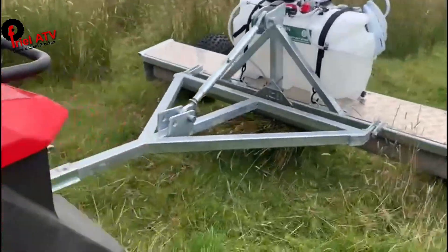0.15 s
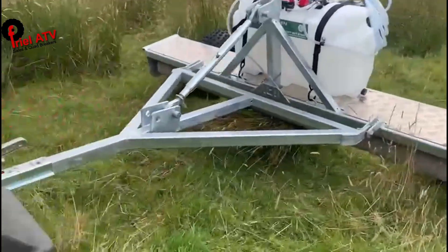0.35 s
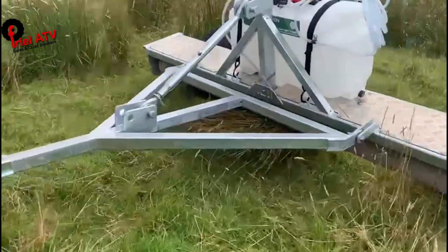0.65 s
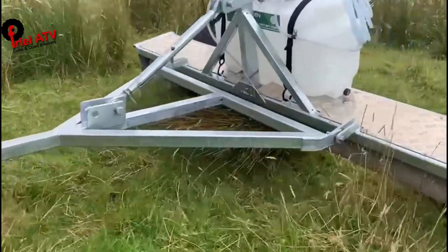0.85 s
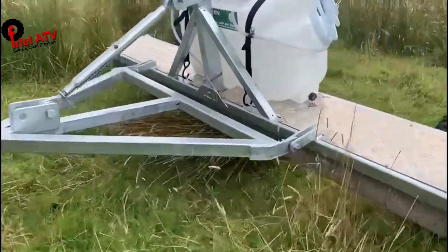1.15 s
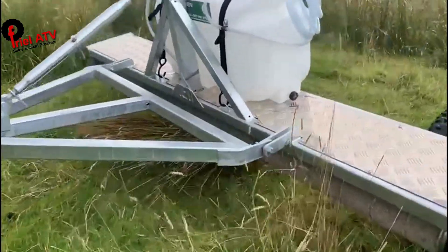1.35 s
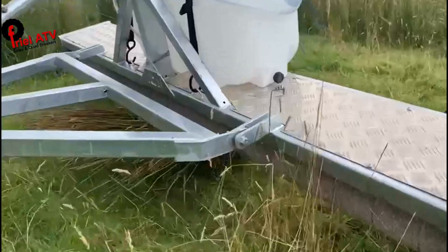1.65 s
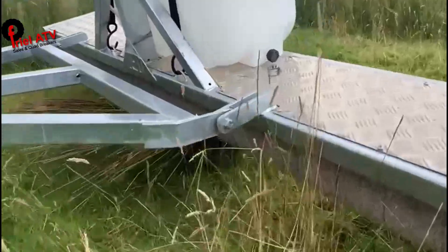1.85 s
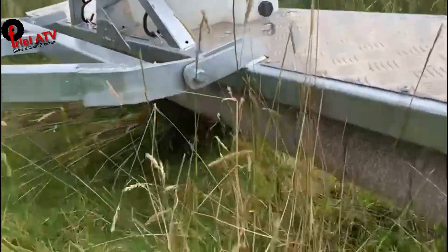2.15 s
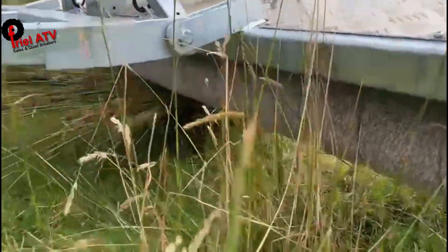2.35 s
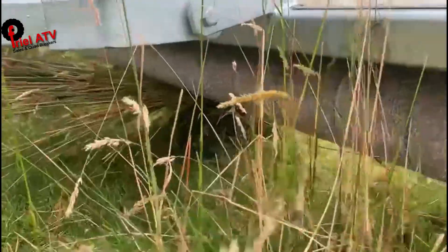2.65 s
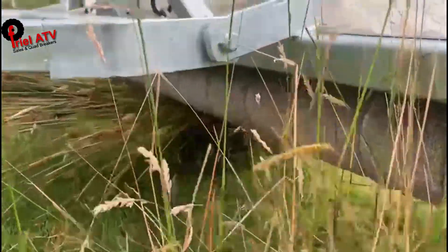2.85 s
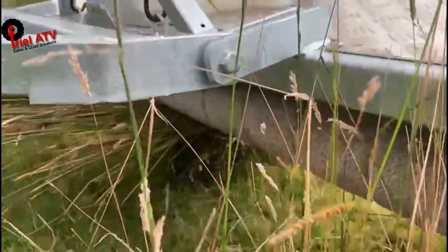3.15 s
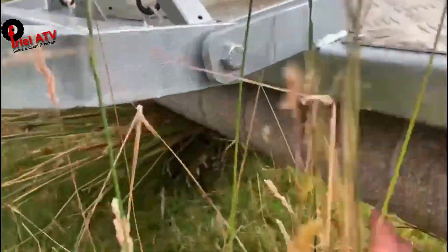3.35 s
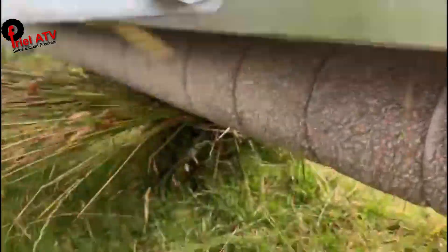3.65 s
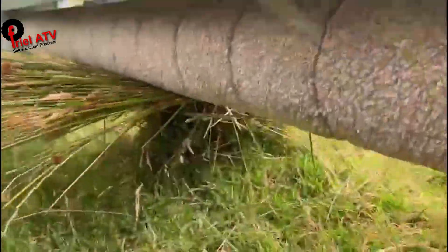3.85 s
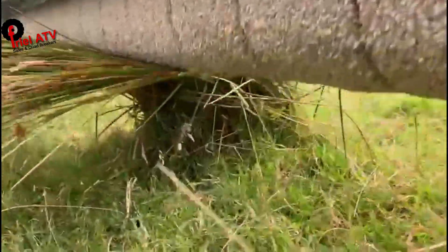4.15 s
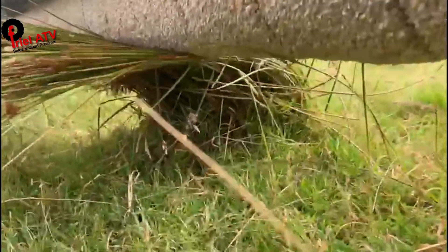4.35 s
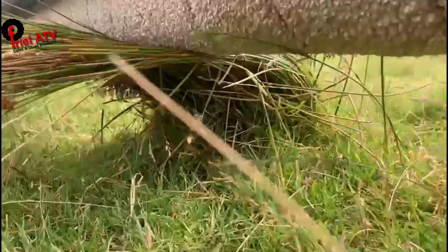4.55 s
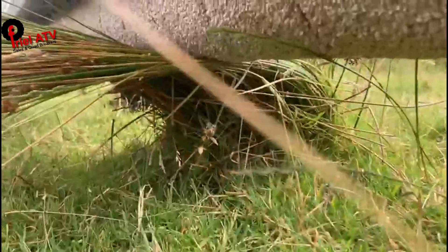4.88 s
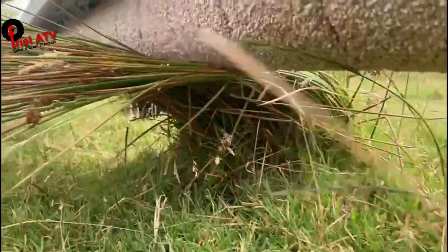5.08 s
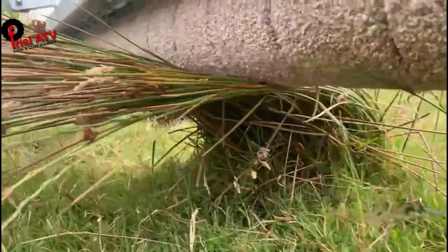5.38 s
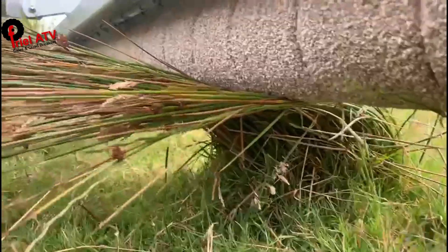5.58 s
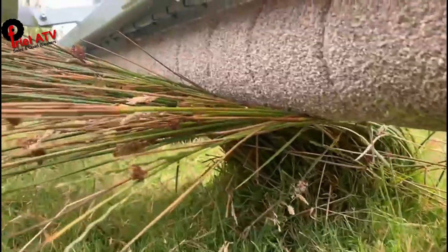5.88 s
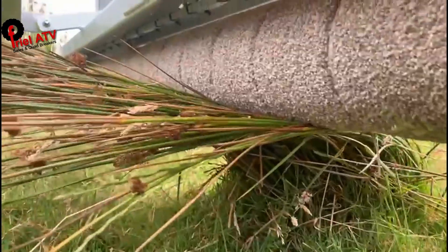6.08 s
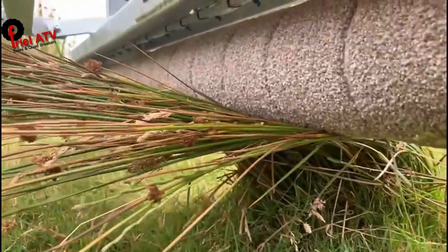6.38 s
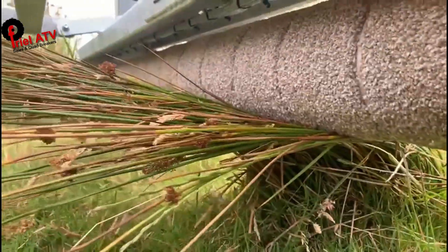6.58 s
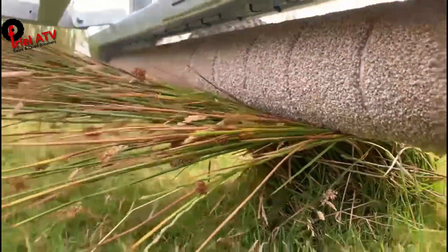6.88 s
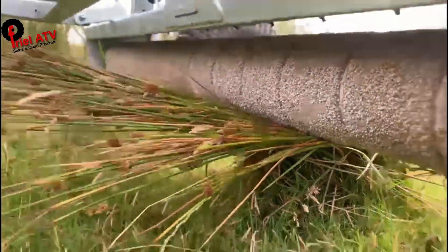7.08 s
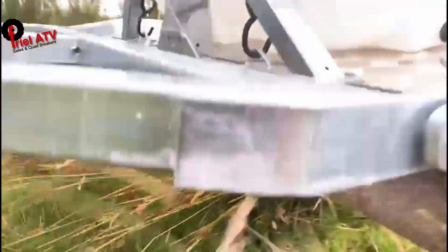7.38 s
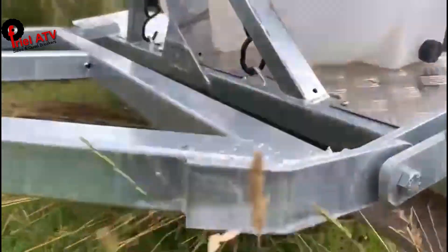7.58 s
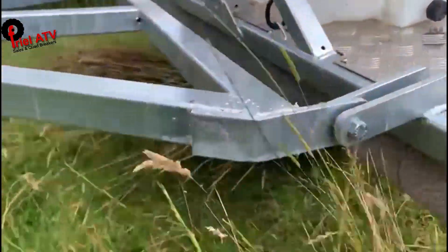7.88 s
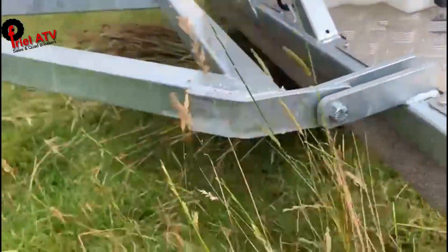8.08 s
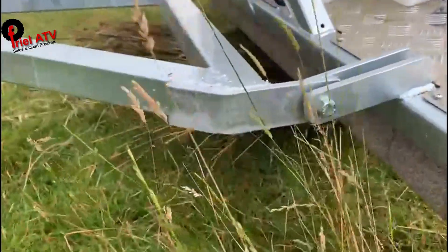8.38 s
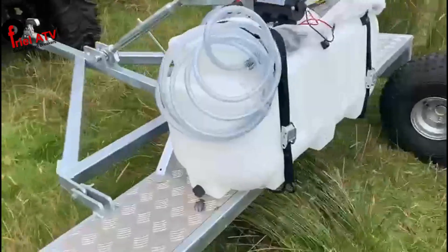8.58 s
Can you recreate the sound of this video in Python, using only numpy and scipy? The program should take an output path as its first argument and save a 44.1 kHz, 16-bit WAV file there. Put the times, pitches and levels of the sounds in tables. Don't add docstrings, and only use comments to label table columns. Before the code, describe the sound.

Outdoors, a small engine idles continuously at roughly a dozen firings a second, boomy and slightly uneven. Hissing gas bursts, hollow pipe rings and light ticking ride on each beat. The listener walks around it, from further off to close by. There are dry stalk clicks early in the walk and a louder cluster midway, then late knocks and brushing, a heavy handling thump, and a sudden jump to a softer viewpoint.

```python
import sys
import numpy as np
from scipy import signal
from scipy.fft import rfft, irfft, next_fast_len
from scipy.io import wavfile
from scipy.ndimage import uniform_filter1d

SR = 44100
rng = np.random.default_rng(int(sys.argv[2]) if len(sys.argv) > 2 else 0)


def master(y):
    cut = np.clip(np.atleast_2d(y).T, -1, 1)
    pcm = np.round(cut * 32767)
    wavfile.write(sys.argv[1], SR, pcm.astype(np.int16))


def decibels_to_gain(level_db):
    exponent = np.asarray(level_db, float) / 20
    return 10 ** exponent


N = 384993

# f/Hz, level/dB, t60/s, lag after firing/ms
CHAMBERS = [
    (54.9, -23.8, 0.156, -5.04),
    (75.2, -14.2, 0.053, 5.26),
    (107.6, -15.2, 0.092, 9.72),
    (158.9, -16.9, 0.036, 2.71),
    (193.5, -22.8, 0.036, 14.11),
    (324.4, -35.7, 0.07, 4.7),
    (327.8, -33.2, 0.047, 9.55),
]
# f/Hz, density/dB per Hz
PUFF_SPECTRUM = [(30, 7), (100, 12), (200, 3.5), (345, -7.5), (430, -3.5), (520, -7.5), (690, -6),
                 (780, -11.5), (950, -15.5), (1050, -20), (1250, -17), (1550, -20.5), (2050, -30),
                 (2300, -40)]
# f/Hz, depth/dB
PULSE_DEPTH = [(100, 9.6), (400, 5.5), (900, 11), (1300, 9), (1800, 7), (3500, 10), (8000, 5.4)]
# lag after firing/ms, share/1, length/ms
PIPE_ECHOES = [
    (3.22, 0.9, 2.7),
    (12.5, 0.8, 7.5),
    (23.7, 0.71, 5.4),
    (35.3, 0.85, 3.5),
]
# t/s, share/1
PUFF_BITE = [(0, 0.59), (2, .85), (3, 1), (5, 0.86), (6.5, 1.13), (7.6, 1.31), (8.73, 1.05)]
# f/Hz, density/dB per Hz
CLATTER_SPECTRUM = [(2100, -4.5), (2340, -5), (2520, -11.5), (2800, 2), (3100, -2.5), (3500, 1.5),
                    (4000, -22), (4700, -5), (5600, -14.5), (6500, -13), (7700, -8.5), (8100, -11.5),
                    (9200, -7.5), (10400, -17.5), (11000, -23)]
# t/s, level/dB, f/Hz, t60/s
SHORT_RINGS = [(2.596, -28, 1240, 0.0028), (2.5964, -16, 2010, 0.0031), (2.5985, -19.5, 713, 0.0061),
               (2.6035, -41.5, 2005, 0.0048), (2.6545, -49, 5550, 0.0036), (3.885, -42.5, 2210, 0.01),
               (3.892, -32.5, 906, 0.02), (3.9012, -43.5, 4250, 0.004), (3.9016, -19.5, 1600, 0.0068),
               (3.904, -15.5, 729, 0.019), (3.907, -22, 408, 0.037), (3.9115, -42, 4200, 0.013),
               (3.912, -19, 1462, 0.0091), (3.9125, -28, 2290, 0.0012), (3.915, -13.5, 647, 0.018),
               (3.9185, -26, 413, 0.033), (3.9195, -28.5, 1380, 0.016), (3.92, -35, 3080, 0.0071),
               (3.9255, -38, 3150, .005), (3.872, -50, 4300, .008), (3.885, -48, 4300, .008),
               (3.9245, -34, 4340, 0.0035), (3.926, -28.5, 1100, 0.0095), (3.927, -35.5, 1940, 0.013),
               (3.933, -32.5, 556, 0.041), (3.938, -32.5, 790, 0.024), (7.09, -35.5, 840, .03),
               (7.168, -36, 840, .03), (7.552, -39, 910, .02), (7.776, -40, 884, 0.023),
               (7.8855, -38, 1710, 0.0067), (7.8865, -45, 5320, 0.0069), (7.885, -30.5, 3076, 0.0071),
               (7.886, -26.5, 960, 0.0094), (7.889, -11, 159, 0.032), (8.172, -47.5, 1200, 0.12),
               (8.4048, -7.5, 341, 0.028), (8.481, -8, 191, 0.016), (8.485, -29, 810, .012)]
# f/Hz, phase/rad
PHASE_TURN = [(138, 3.1416), (155, 3.8), (185, 4.6), (260, 5.8), (345, 6.3), (480, 6.6), (650, 9.1),
              (775, 10.2), (900, 12.5), (950, 12.7), (1120, 15.7), (1250, 16.7), (1400, 14.6), (1550, 15.2),
              (1770, 12.6), (2450, 12.4), (2600, 10.4), (2870, 10.6), (3000, 9.5), (3350, 9.4), (3700, 6.3),
             (4450, 6.2), (4800, 3.1), (5500, 3.1), (6000, 6.3), (6900, 6.3), (7200, 9.4), (7750, 9.4),
             (9000, 15.7), (12000, 15.7)]
# t/s, f/Hz
IN_STEP_EDGE = [(0, 146), (.85, 144), (1.08, 116), (1.45, 98), (1.6, 72), (2.0, 50), (2.15, 5), (8.73, 5)]
# f/Hz, share/1
RIGHT_LOOSE = [(150, .02), (300, .3), (500, .5), (700, .5), (1000, .3), (1150, .2), (1350, .45), (1900, .12),
               (2500, .8), (3100, .3), (4000, .7), (5100, .75), (6300, .8), (7400, .45), (8600, .7)]
# f/Hz, level/dB
FAR_DULLING = [(400, 5.5), (650, -1), (850, -9.5), (1500, -20), (1750, -3), (2000, -9), (2300, -19)]
# start/s, full/s, fading/s, end/s, level/dB
SWISHES = [
    (3.816, 3.825, 3.855, 3.865, -64),
    (3.86, 3.91, 3.93, 3.952, -65),
    (7.86, 7.89, 7.945, 7.975, -57.5),
    (7.985, 8.05, 8.115, 8.14, -59),
    (8.11, 8.14, 8.17, 8.22, -70),
    (8.375, 8.40, 8.41, 8.44, -76),
]
# f/Hz, level/dB
SWISH_COLOUR = [(2500, 5), (3100, 6), (3600, 3.5), (4000, 2), (4600, 5), (5500, 3), (6200, -1), (6600, -6)]
# start/s, full/s, fading/s, end/s, low f/Hz, high f/Hz, level/dB
SCRAPES = [
    (1.12, 1.17, 1.23, 1.28, 3000, 5500, -67),
    (1.17, 1.219, 1.31, 1.36, 2710, 4500, -67),
    (2.592, 2.592, 2.6, 2.612, 1200, 3200, -55.5),
    (3.875, 3.898, 3.925, 3.95, 700, 2490, -48),
    (8.374, 8.386, 8.43, 8.475, 700, 1990, -57),
    (8.38, 8.401, 7.4, 8.7, 2000, 4000, -66),
]
# f/Hz, level/dB
LOW_LIFT = [(22, -1), (32, -7), (48, 10), (62, 5.5)]
# f/Hz, level/dB
TAIL_PIPE = [(600, 0), (690, -3), (760, 0), (850, -5), (920, -3), (1020, 3.5), (1140, 4), (1260, -1),
             (1400, 0), (1520, -3.5), (1650, 0.5), (1900, 3.5), (2100, -1), (2250, -4)]
# start/s, end/s, low f/Hz, high f/Hz
TREBLE_IN_STEP = (7.84, 8.2, 2500, 7000)
# t/s, speed/rpm
SPEED = [(0.0, 1591.1), (0.4, 1491.4), (1.2, 1469.9), (1.6, 1544.1), (2.25, 1549.7), (3.15, 1549.3),
         (3.4, 1512.6), (3.8, 1553.5), (4.8, 1530.3), (5.15, 1511.8), (5.75, 1562.0), (6.0, 1529.5),
         (6.8, 1523.5), (7.1, 1562.5), (7.8, 1552.2), (8.4, 1507.5)]
# t/s, nearness to silencer/dB, facing the tail pipe/dB
WALK = [(0, -16, 7), (.4, -12.5, 4.5), (1.2, -11, 2), (2, -8, 1.5), (2.4, -6.5, -0.5), (2.8, -5.5, 0),
        (3.6, -4.5, 3.5), (4.4, -3, 0.5), (6.8, -3.5, 0.5), (7.2, -4, 0), (8, -6, 2), (8.73, -6, 1)]
# centre/s, half length/s, low rustle/dB, high rustle/dB
STIRS = [(.08, 0.41, -72.5, -82), (0.718, 0.13, -76.5, -81), (1.344, 0.31, -78, -93),
         (1.837, 0.17, -79.5, -76.5), (2.703, 0.28, -91.5, -87.5), (3.247, 0.4, -90.5, -85.5),
         (3.752, 0.1, -85, -83), (3.942, 0.062, -71, -85.5), (4.2, 0.17, -92.5, -84), (4.517, .1, -78, -96),
         (5.799, 0.4, -79, -100), (6.6, 0.71, -79, -101), (7.279, 0.098, -75, -80.5),
         (7.518, 0.18, -92, -85), (8.002, 0.11, -74, -85), (8.444, 0.22, -90.5, -102.5)]
# t/s, level/dB, f/Hz, t60/s
BUMPS = [
    (8.4035, -27, 1100, 0.0084),
    (8.4033, -37.5, 1900, 0.0052),
    (7.4, -24, 760, 0.0055),
    (8.4066, -15, 350, 0.018),
    (8.431, -10, 32, 0.076),
    (8.4086, -5, 49, 0.07),
]
# start/s, length/s
LOCKS = [(2.304, 0.13), (2.547, 0.0084), (2.619, 0.12), (2.838, 0.07), (3.053, 0.33), (3.478, 0.12),
         (3.66, 0.02), (3.755, 0.096), (3.98, 0.025), (4.052, 0.031), (4.155, 0.18), (4.535, 0.04),
         (4.88, 0.053), (4.99, 0.075), (5.243, 0.012), (5.437, 0.098), (5.911, 0.15), (6.313, 0.022),
         (6.454, 0.018), (7.166, 0.029), (7.363, 0.063), (7.453, 0.097), (7.69, 0.06), (8.05, 0.062)]
# t/s, f/Hz, phase/rad
LEAKS = [(3.21, 110, 0.16), (3.79, 95, .12), (4.07, 95, 0.21), (4.27, 115, .15), (4.52, 110, 0.16),
         (5.93, 105, .12), (5.98, 100, 0.22), (6.35, 105, 0.21), (7.48, 90, 0.27), (2.4, 110, 0.071)]
# t/s, low f/Hz, high f/Hz, phase/rad, lag/ms
CLOSE_TOUCHES = [(1.17, 3500, 5400, 1.3, 0), (1.23, 2900, 5600, 1.5, 0), (1.29, 2600, 4800, 1.3, 0),
                 (3.835, 2700, 4700, .4, 0), (2.6, 1100, 3250, 6.4, .5), (2.6, 3250, 7000, 0, 0),
                 (3.91, 1100, 2400, 4.5, .5), (3.91, 2400, 5600, 2.1, 0), (8.41, 1100, 2300, 2.1, 0),
                 (8.41, 2300, 4700, 3.3, .5)]
# f/Hz, level/dB, t60/s, lag after firing/ms
SHELL_MODES = [
    (676, -1, 0.018, 1.6),
    (1020, 1, 0.027, 5),
    (1310, -7, 0.074, 3.5),
    (1850, -13, 0.009, 2.3),
    (434, -1, 0.074, 3.5),
]
# t/s, level/dB
HOOT = [(0, 2.5), (1.2, 7.5), (1.6, 18.5), (2.1, 17), (2.5, 3), (3.3, -1), (4.5, 1.5), (5.3, 5), (6.5, 3),
        (7.5, 1.5), (8.73, 0.5)]
# t/s, level/dB
KNOCK = [(0, -12), (1.5, -14), (2.4, -0.5), (3.3, 2.5), (4, -6), (5.5, -1), (6.8, 1.5), (7.1, 4.5),
         (7.8, 1), (8.4, -1.5), (8.5, -23), (8.73, -18)]
# f/Hz, |cosine|/1
PHASE_SNAP = [(600, .65), (2000, .65), (2300, .25), (9000, .3)]
# f/Hz, threshold/spreads
HOLES = [(600, -1.5), (1900, -1.4), (2150, -.6), (2300, -.2), (2700, -.6), (3200, -1.2), (4000, -.3),
         (5000, -.8), (7500, -.8), (8000, -1.6), (10500, -1.6)]
# t/s, level/dB
WHISTLE_LEVEL = [(0, -21.5), (3.8, -15.5), (4.3, -5), (7.2, -5.5), (7.8, -11), (8.48, -17), (8.5, -22),
                 (8.73, -27)]

CHANGE_S = .0 + 8.4875


def rms_one(x):
    return x / np.sqrt(np.mean(x ** 2) + 1e-20)


def in_time(rows):
    s, *columns = np.transpose(rows)
    return [np.interp(np.arange(N) / SR, s, c) for c in columns]


def at_hz(points, hz):
    f, value = np.transpose(points)
    return np.interp(np.log(hz), np.log(f), value)


def colour(x, spectrum):
    size = next_fast_len(N)
    hz = np.maximum(np.fft.rfftfreq(size, 1 / SR), 1)
    return irfft(rfft(x, size) * decibels_to_gain(at_hz(spectrum, hz)), size)[:N]


def band_pass(x, order, low_hz, high_hz):
    return signal.sosfilt(signal.butter(order, [low_hz, high_hz], "band", fs=SR, output="sos"), x)


def drift(rate_hz):
    r = np.exp(-80 * np.pi * rate_hz / SR)
    slow = signal.lfilter([1], [1, -2 * r, r * r], rng.standard_normal(N // 40 + 2002))[2000:]
    return np.interp(np.arange(N) / 40, np.arange(len(slow)), rms_one(slow))


def strike(at_s, sizes, shape):
    clicks = np.zeros(N)
    at = np.round(np.asarray(at_s) * SR).astype(int)
    inside = (at >= 0) & (at < N)
    clicks[at[inside]] = np.broadcast_to(sizes, at.shape)[inside]
    return signal.oaconvolve(clicks, shape)[:N]


def grains(per_s, spread_db):
    sizes = decibels_to_gain(spread_db * np.minimum(rng.exponential(1, (2, N)), 5))
    sizes = sizes * rng.choice([-1, 1], (2, N))
    return sizes * (rng.random((2, N)) < per_s / SR) + 1e-18


def banded(spectrum, source, gate, flicker_db):
    out = 0
    edges_hz = np.exp(np.arange(np.log(spectrum[0][0]), np.log(spectrum[-1][0]), np.log(2) / 4))
    for k, (low_hz, high_hz) in enumerate(zip(edges_hz, edges_hz[1:])):
        band = band_pass(source[k % 2], 3, low_hz, high_hz)
        depth_db = at_hz(PULSE_DEPTH, np.sqrt(low_hz * high_hz))
        out = out + band * decibels_to_gain(depth_db * gate + flicker_db * drift(6.1))
    return rms_one(colour(out, spectrum))


def patchy(x, hole_db):
    hz, _, cells = signal.stft(x, SR, nperseg=1024, noverlap=768)
    hz = hz[:, None]
    chance = uniform_filter1d(rng.standard_normal(cells.shape), size=6, axis=1)
    chance = rms_one(uniform_filter1d(chance, size=4, axis=0))
    gain = np.where((chance < at_hz(HOLES, hz + 1)) & (hz > 600), decibels_to_gain(hole_db), 1)
    wander = uniform_filter1d(rng.standard_normal(cells.shape), size=24, axis=1)
    wander = rms_one(uniform_filter1d(wander, size=2, axis=0))
    gain = gain * decibels_to_gain(2.5 * wander * (hz < 2600))
    return signal.istft(cells * gain, SR, nperseg=1024, noverlap=768)[1][:N]


def grass():
    t = np.arange(N) / SR
    low, high = grains(per_s=16000, spread_db=2.0)
    low = band_pass(low, 4, 2500, 6500)
    high = band_pass(high, 4, 7700, 10600)
    low_gain, high_gain = decibels_to_gain(-91.5), decibels_to_gain(-102)
    for s, half, low_db, high_db in STIRS:
        moments = [s - 1.5 * half, s - half / 2, s + half / 2, s + 1.5 * half]
        swell = np.interp(t, moments, [0, 1, 1, 0])
        low_gain = low_gain + decibels_to_gain(low_db) * swell
        high_gain = high_gain + decibels_to_gain(high_db) * swell
    swish_gain = 0
    for *moments, level_db in SWISHES:
        swish_gain = swish_gain + decibels_to_gain(level_db) * np.interp(t, moments, [0.0074, 0.57, 0.79, 0.0033])
    swish = rms_one(colour(low, SWISH_COLOUR))
    low = rms_one(colour(low, [(2500, 10.0), (4200, 4.5), (5500, 2.5), (6500, -7.5)]))
    high = rms_one(colour(high, [(7900, -14), (8000, 1.5), (9000, 0.0), (9800, -1.5), (10500, -10)]))
    return swish_gain * swish + low_gain * low + high_gain * high


def scrapes():
    out, t = np.zeros(N), np.arange(N) / SR
    grit = grains(per_s=5000, spread_db=3.0)
    for k, (*moments, low_hz, high_hz, level_db) in enumerate(SCRAPES):
        drag = rms_one(band_pass(grit[k % 2], 3, low_hz, high_hz))
        out += decibels_to_gain(level_db) * np.interp(t, moments, [0, 1, 1, 0]) * drag
    return out


def touches(rows, sag):
    out, t = np.zeros(N), np.arange(SR // 6) / SR
    for s, level_db, hz, t60 in rows:
        turns = hz * (t + sag * t60 / 6 * (1 - np.exp(-6 * t / t60)))
        ring = decibels_to_gain(level_db - 60 * t / t60) * np.minimum(1, t * hz) * np.sin(2 * np.pi * turns)
        crack_db = level_db + min(-29.5 + 9.5 * np.log2(hz / 1000), -12)
        crack = decibels_to_gain(crack_db - 60 * t / .008) * rng.standard_normal(len(t))
        crack = signal.lfilter([.5], [1, -.5], crack)
        at = round(s * SR)
        out[at:at + len(t)] += (ring + crack)[:N - at]
    return out


def firings():
    first_s, first_after_s, rpm_after = .0218, 8.5068, 1521
    s = np.arange(-SR // 10, N) / SR
    cycles = np.cumsum(np.interp(s, *np.transpose(SPEED))) / 120 / SR
    cycles -= np.interp(first_s, s, cycles)
    before = np.interp(np.arange(-1, cycles[-1]), cycles, s)
    after = np.arange(first_after_s, N / SR + .05, 120 / rpm_after)
    return np.r_[before[before < CHANGE_S - .02], after]


def puff_gate(fired):
    ms = np.arange(SR // 12) / SR * 1000
    shape = sum(share * np.exp(-((ms - lag_ms - 8) / wide_ms) ** 2) for lag_ms, share, wide_ms in PIPE_ECHOES)
    return strike(fired - .008, decibels_to_gain(.6 * rng.standard_normal(len(fired))), shape)


def clatter(gate):
    return banded(CLATTER_SPECTRUM, grains(per_s=9000, spread_db=3.0), gate, flicker_db=2.5)


def whistle(gate):
    f_hz, width_hz, level_db = 2360, 110, -75
    b, a = signal.iirpeak(f_hz, f_hz / width_hz, fs=SR)
    sung = rng.standard_normal(N) * decibels_to_gain(12.0 * gate)
    sung = signal.lfilter(b, a, signal.lfilter(b, a, sung))
    return decibels_to_gain(level_db + in_time(WHISTLE_LEVEL)[0]) * rms_one(sung)


def pings(fired):
    out, t = np.zeros(N + SR), np.arange(SR // 12) / SR
    chance = rng.standard_normal((len(fired), len(SHELL_MODES), 2, 3))
    for k, (hz, mode_db, t60, lag_ms) in enumerate(SHELL_MODES):
        envelope = np.minimum(1, t * hz / 2) * np.exp(-np.log(1000) / t60 * t)
        for row, s in zip(chance[:, k], fired):
            hoot_db = np.interp(s, *np.transpose(HOOT)) if k == 0 else 0
            for knock, (size, pitch, late) in enumerate(row):
                at = round((s + (lag_ms + 8.2 * knock + 1.5 * late) / 1000) * SR)
                if at < 0:
                    continue
                level_db = mode_db + hoot_db - 15.0 * knock + 3 * size
                tone = np.sin(2 * np.pi * hz * (1 + .03 * pitch) * t)
                out[at:at + len(t)] += decibels_to_gain(level_db) * envelope * tone
    return out[:N] * decibels_to_gain(-48 + in_time(KNOCK)[0])


def puffs(gate):
    gas = banded(PUFF_SPECTRUM, rng.standard_normal((2, N)), gate * in_time(PUFF_BITE)[0], flicker_db=.7)
    gas = colour(gas, TAIL_PIPE)
    return np.where(np.arange(N) < CHANGE_S * SR, gas, colour(gas, FAR_DULLING))


def exhaust(fired):
    boom, bark, t = np.zeros(N), np.zeros(N), np.arange(SR // 4) / SR
    chance = rng.standard_normal((len(fired), len(CHAMBERS), 2))
    for k, (hz, level_db, t60, lag_ms) in enumerate(CHAMBERS):
        fall = np.log(1000) / t60 * t
        shape = fall * np.exp(1 - fall) * np.sin(2 * np.pi * hz * t)
        at_s = fired + (lag_ms + .12 * chance[:, k, 0]) / 1000
        rung = strike(at_s, decibels_to_gain(level_db + .6 * chance[:, k, 1]), shape)
        if hz < 130:
            boom = boom + rung
        else:
            bark = bark + rung
    return rms_one(boom), rms_one(bark)


def scene():
    t = np.arange(N) / SR
    near_db, facing_db = in_time(WALK)
    far = np.interp(t, [CHANGE_S - .017, CHANGE_S], [0, 1])
    duck = decibels_to_gain(np.interp(t, [8.462, 8.472, 8.477, 8.48], [0, -22, -22, 0]))
    fired = firings()
    gate = puff_gate(fired)
    boom, bark = exhaust(fired)
    throat = signal.sosfilt(signal.butter(3, 255, "high", fs=SR, output="sos"), bark)
    beat = decibels_to_gain(-23 + 0.44 * near_db - 4 * far) * colour(boom, LOW_LIFT)
    beat = beat + decibels_to_gain(-23.5 + near_db - 10.5 * far) * bark
    beat = beat + decibels_to_gain(-44.5 - 0.41 * near_db + 1.6 * facing_db - 10.5 * far) * throat
    hiss = decibels_to_gain(-38 + facing_db - 3.5 * far) * puffs(gate) + grass() + whistle(gate)
    hiss = hiss + decibels_to_gain(-77.5 - 0.12 * near_db - 8 * far) * clatter(gate)
    engine = duck * (beat + patchy(hiss, hole_db=-30) + pings(fired))
    handling = scrapes() + touches(SHORT_RINGS, sag=.05) + touches(BUMPS, sag=1.5)
    return np.tile(engine + handling, (2, 1))


def bass_slip(s):
    waver = np.interp(s * SR, np.arange(N), drift(22))
    slip = (0.23 + 0.011 * (s - 2)) * np.maximum(1 + .35 * waver, 0)
    slip = slip * np.where(s > CHANGE_S, decibels_to_gain(-3.5), 1)
    for start, length in LOCKS:
        moments = [start - .03, start, start + length, start + length + 0.034]
        slip = slip * np.interp(s, moments, [1, .008, .008, 1])
    return slip + 0.65 * np.exp(-((s - BUMPS[-1][0] - .012) / 0.029) ** 2)


def widen(left):
    hz, s, cells = signal.stft(left, SR, nperseg=2048, noverlap=1792)
    hz = np.maximum(hz, 30)[:, None]
    slip = bass_slip(s) * (80 / hz) ** 1.1 * np.clip((145 - hz) / 60, 0, 1)
    for at, leak_hz, leak in LEAKS:
        slip = slip + leak * np.exp(-((s - at) / .025) ** 2 - ((hz - leak_hz) / 17) ** 2)
    turn = np.interp(hz, *np.transpose(PHASE_TURN)) - slip
    edge_hz = np.interp(s, *np.transpose(IN_STEP_EDGE))
    turn = turn * np.clip((hz - edge_hz) / 20 + .5, 0, 1)
    start, end, low_hz, high_hz = TREBLE_IN_STEP
    turn = np.where((s > start) & (s < end) & (hz > low_hz) & (hz < high_hz), -.6, turn)
    blocks = rng.standard_normal((len(hz) // 8 + 1, len(s) // 8 + 1))
    loose = np.kron(blocks, np.ones((8, 8)))[:len(hz), :len(s)]
    turn = turn + 1.6 * np.clip(at_hz(RIGHT_LOOSE, hz), 0, 1) * (hz > 150) * loose
    snaps = (hz > 600) & (abs(np.cos(turn)) > at_hz(PHASE_SNAP, hz))
    turn = np.where(snaps, np.pi * np.round(turn / np.pi), turn)
    for at, low_hz, high_hz, phase, lag_ms in CLOSE_TOUCHES:
        near = (abs(s - at) < .04) & (hz > low_hz) & (hz < high_hz)
        turn = np.where(near, phase - 2 * np.pi * hz * lag_ms / 1000, turn)
    return signal.istft(cells * np.exp(1j * turn), SR, nperseg=2048, noverlap=1792)[1][:N]


def low_pass(x):
    return signal.sosfilt(signal.butter(12, 11500, fs=SR, output="sos"), x)


def record(dry):
    pair = np.array([dry[0], widen(dry[1])])
    n = np.arange(90)
    click = np.exp(-n / 3.0) + .6 * np.exp(-n / 11.0) - .2 * np.exp(-n / 40.0)
    pair = pair + decibels_to_gain(-25) * strike([CHANGE_S + .0008], 1, click) * [[1], [-1.5]]
    mirror = decibels_to_gain(-66.0) * pair * np.cos(np.pi / 2 * np.arange(N))
    return low_pass(pair + mirror)


dry = scene()
out = record(dry)
master(out)
```